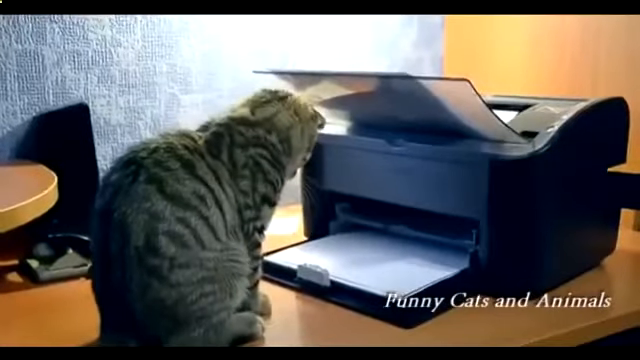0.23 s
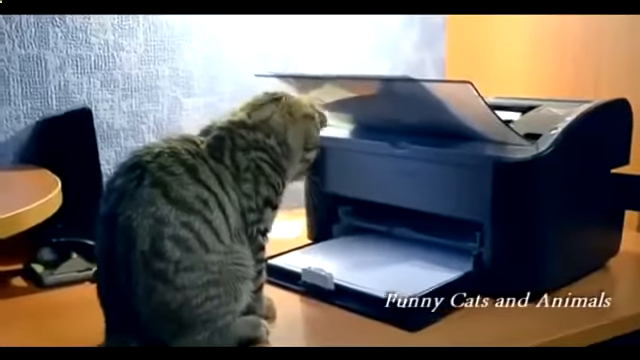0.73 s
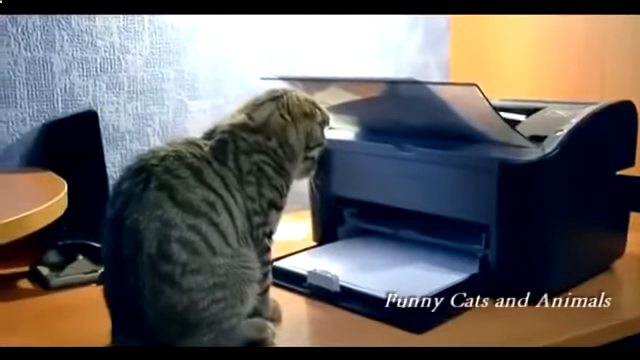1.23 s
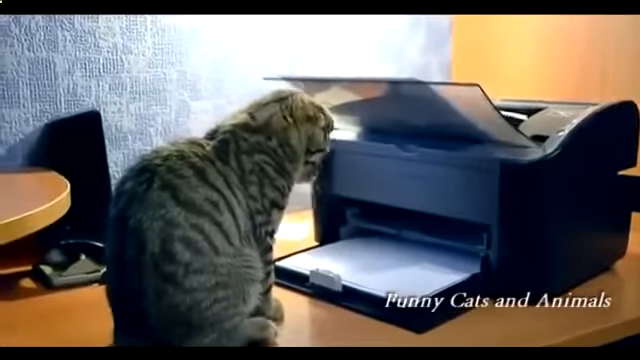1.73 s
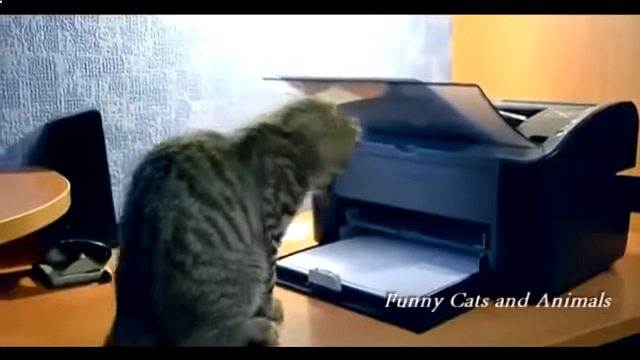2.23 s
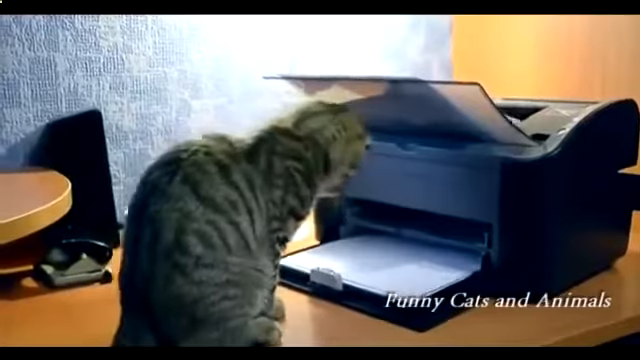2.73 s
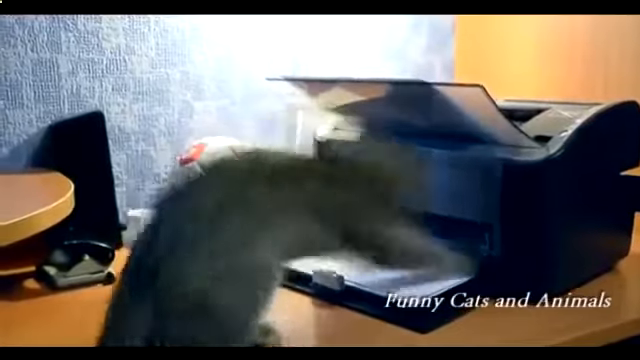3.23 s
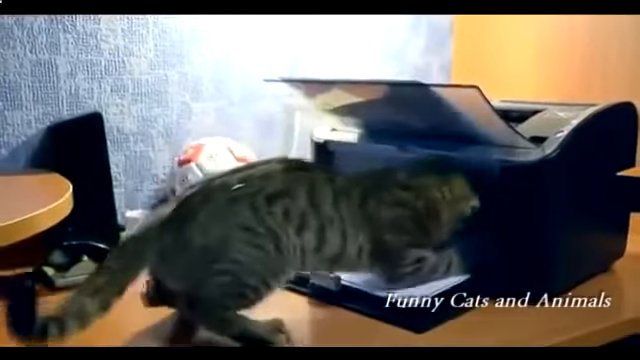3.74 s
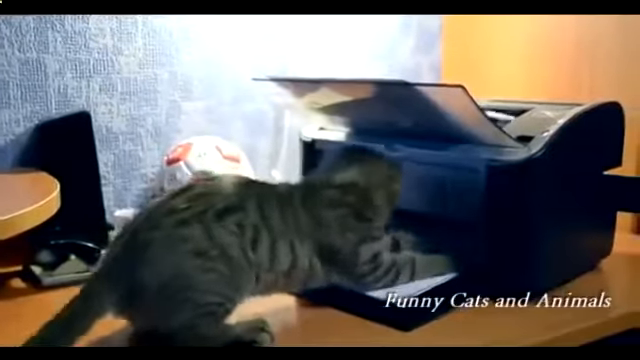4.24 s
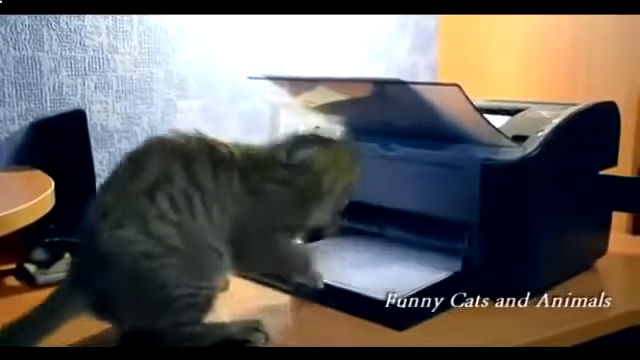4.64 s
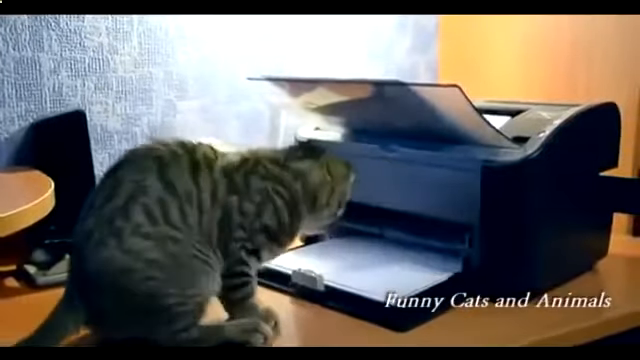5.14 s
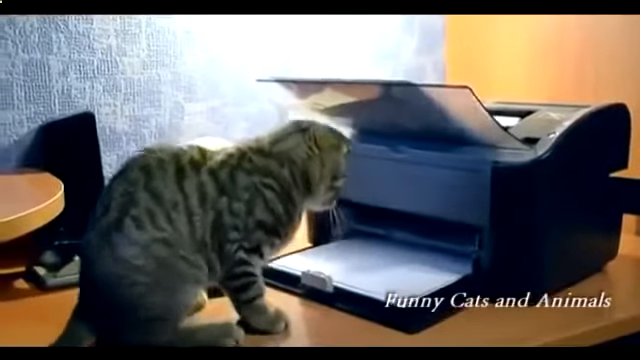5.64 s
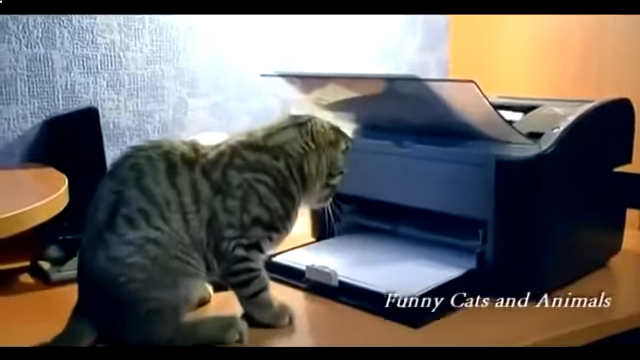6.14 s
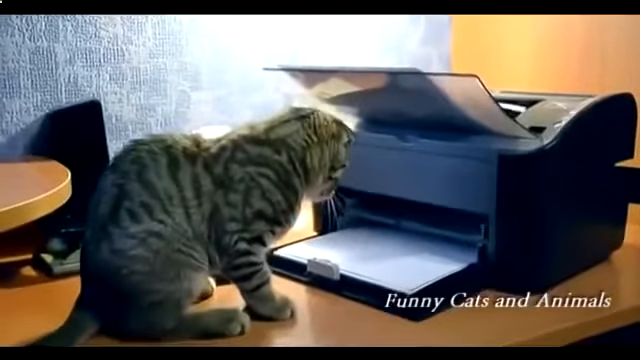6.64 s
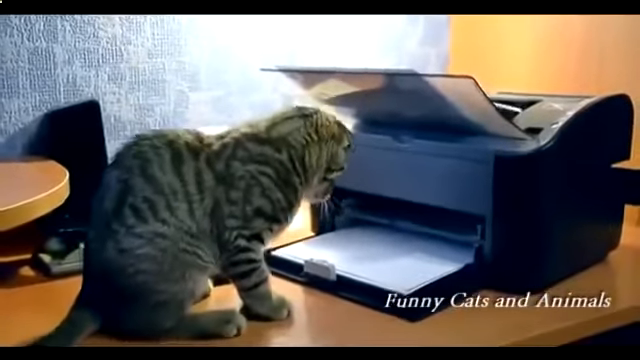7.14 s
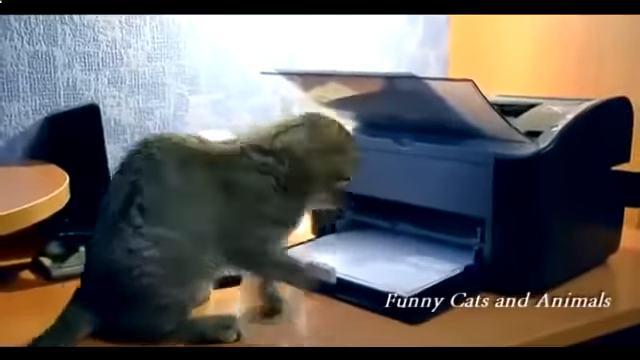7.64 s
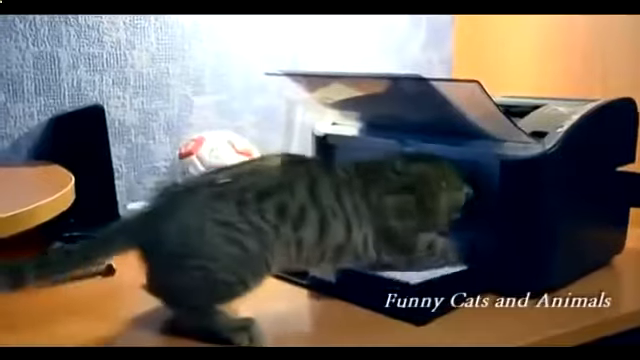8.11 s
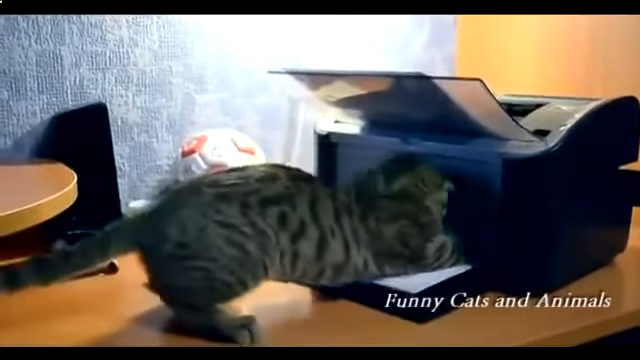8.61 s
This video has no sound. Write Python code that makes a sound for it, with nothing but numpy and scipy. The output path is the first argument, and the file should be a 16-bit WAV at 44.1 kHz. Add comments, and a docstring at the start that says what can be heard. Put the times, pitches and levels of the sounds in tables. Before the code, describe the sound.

A desktop printer runs in a small room with a steady whine, whirring gears, a low fan and the soft hiss of sliding paper. It feeds two sheets, each with a run of plastic clacks, a sharp latch snap and a brief dry crackle. After each run, a cat bats at the tray, making it knock and rattle, and briefly scrapes the paper. The sounds are centred and fairly close.

```python
"""A steady whine over whirring gears, hissing paper and a low fan: a desktop laser printer feeds
two sheets in a small room. The scanner motor holds its pitch; the drive gear sings as the rollers pull.
Clutches and flaps clack in the plastic case, a latch snaps and the paper crackles, in a cycle that
comes round with each sheet. After each cycle's clacks a cat paws at the tray and scrapes the paper."""
import sys
import numpy as np
from scipy import signal
from scipy.fft import rfft, irfft
from scipy.io import wavfile

SR = 44100
rng = np.random.default_rng(int(sys.argv[2]) if len(sys.argv) > 2 else 0)


def unload_audio(sound):
    """Save the sound as a 16-bit wav file, at the path given as the first command line argument."""
    columns = np.transpose(np.atleast_2d(sound))
    # keep every value between -1 and 1, then stretch to whole-number steps
    steps = np.round(np.clip(columns, -1, 1) * 32767)
    wavfile.write(sys.argv[1], SR, steps.astype(np.int16))


N = 391166
TIME = np.arange(N) / SR
SHEET_S = 4.8  # one feed cycle


def amp(db):
    """Decibels to gain."""
    return 10 ** (np.asarray(db) / 20)


def unit(x):
    """Normalises to rms 1."""
    return x / np.sqrt(np.mean(x ** 2) + 1e-20)


def curve_at(points, hz):
    """Reads a curve along a log-frequency axis."""
    f, value = np.transpose(points)
    return np.interp(np.log(hz + 1), np.log(f), value)


def wander(hz):
    """Random modulator of rms 1, rolling off above hz."""
    f = np.fft.rfftfreq(N, 1 / SR)
    return unit(irfft(rfft(rng.standard_normal(N)) / (1 + (f / hz) ** 4), N))


def swell(middle_s, half_s):
    """Bell-shaped envelope of height 1."""
    return np.exp(-((TIME - middle_s) / half_s) ** 2)


def tone(hz, flutter, drift, flutter_hz=11.7):
    """A sine with random flutter in level and drift in pitch."""
    turns = np.cumsum(hz * (1 + drift * wander(3.84))) / SR
    return np.sqrt(2) * np.sin(2 * np.pi * turns) * (1 + flutter * wander(flutter_hz))


# resonances of the plastic case: f/Hz, width/Hz, boost/dB
CASE_MODES = [(359, 62, 1.5), (509.5, 45, 5), (740, 78, -1), (835, 45, 2), (1075, 38, 0.5),
              (1260, 38, -1.5), (1293, 110, 2), (1634, 82, 0.5), (1920, 42, -2), (2065, 69, 2.5),
              (2317, 48, -2.5), (2740, 96, 1), (3340, 73, 0.5), (3700, 88, 2), (6220, 180, 3),
              (6880, 94, 2)]
def colour(x, eq, ring=0., size=4096):
    """Causal filter of unit energy: a broad EQ curve plus a share (ring) of the case resonances."""
    f = abs(np.fft.fftfreq(size, 1 / SR))
    peaks_db = sum(db / (1 + (2 * (f - hz) / width) ** 2) for hz, width, db in CASE_MODES)
    log_gain = np.log(amp(curve_at(eq, f) + ring * peaks_db))
    taps = np.fft.ifft(np.exp(np.conj(signal.hilbert(log_gain)))).real  # minimum phase
    return signal.oaconvolve(x, taps / np.linalg.norm(taps))[:N]


# the whine lifts while the cat leans into the tray: middle t/s, half length/s, boost/dB
CAT_LEANS = [(3.8, 0.14, 2), (8.182, 0.26, 3)]
# steady weaker tones beside the whine: f/Hz, level/dB, flutter depth
STEADY_TONES = [(132, -71, 0.76), (263.6, -74, .7), (311.5, -66, 0.25), (368.6, -70.5, .7),
                (415.5, -65, 0.35), (630, -67.5, .6), (760, -70, 0.81), (840, -66.5, 0.69),
                (1016, -60, 0.68), (1063, -64.5, 0.94), (2010, -67, 0.49), (2035, -67, 0.5),
                (2350, -70.5, 0.54)]
def scanner(whine_hz=504.05, whine_db=-43.5, sway_db=0.42):
    """The mirror motor, locked to its speed, whines on one pitch among weaker tones."""
    level_db = whine_db + sway_db * wander(12.0) + sum(db * swell(s, half) for s, half, db in CAT_LEANS)
    whine = amp(level_db) * tone(whine_hz, flutter=0.039, drift=0.00052)
    return whine + sum(amp(db) * tone(hz, flutter, drift=0.001916) for hz, db, flutter in STEADY_TONES)


# fader moves over one feed cycle: t/s, paper level/dB, gear whirr level/dB
FEED_FADERS = [(0.04, -57.5, -44), (0.32, -54, -42.5), (0.92, -51, -42.5), (1.15, -55.5, -45),
               (1.55, -53.5, -44.5), (1.85, -55.5, -44.5), (2.1, -54.5, -42.5), (2.42, -54.5, -44.5),
               (2.62, -52.5, -40.5), (2.85, -54, -45.5), (3.08, -56.5, -43.5), (3.21, -60, -48),
               (3.4, -58.5, -47.5), (3.6, -59, -46.5), (3.85, -56.5, -44.5), (4.55, -55.5, -44)]
def feed_gain(layer):
    """Gain envelope of "paper" or "whirr", looping with each sheet."""
    times, paper_db, whirr_db = np.transpose(FEED_FADERS)
    return amp(np.interp(TIME, times, {"paper": paper_db, "whirr": whirr_db}[layer], period=SHEET_S))


# midrange EQ of the rubbing teeth: f/Hz, level/dB
WHIRR_EQ = [(200, -33), (450, -7.5), (720, -4), (880, 2), (1100, 3.5), (1400, 2), (2100, 0.5), (2500, -1.5),
            (3200, -5.5), (4300, -12.5), (8000, -50), (12000, -67)]
def gear_whirr(tooth_hz=209.5, throb=0.072, lumpy_db=0.76):
    """Teeth rub inside the case: lumpy noise that throbs at the tooth rate."""
    tooth_cycles = np.cumsum(tooth_hz * (1 + 0.0054 * wander(3.1))) / SR
    teeth = 1 + throb * np.cos(2 * np.pi * tooth_cycles)
    rub = unit(rng.standard_normal(N) * teeth * amp(lumpy_db * wander(90)))
    return amp(-3.0) * feed_gain("whirr") * colour(rub, WHIRR_EQ, ring=0.46)


# pulls of the rollers: start t/s, length/s, level/dB
ROLLER_PULLS = [(0.505, 0.3, -46.5), (1.26, 0.51, -48), (1.7, 1.7, -50), (5.84, 0.5, -49.5),
                (6.245, 1.46, -51.5), (7.9, 1.2, -53.5)]
def roller_pull(idle_db=-57, ramp_s=0.1, ease_db_per_s=1.6):
    """Envelope of the gear's song: it idles, swells with each pull and eases off."""
    power = amp(idle_db) ** 2
    for s, length, db in ROLLER_PULLS:
        t = np.clip(TIME - s, 0, length)
        grip = np.minimum(np.minimum(t, length - t) / ramp_s, 1)
        power = power + (grip * amp(db - ease_db_per_s * t)) ** 2
    return np.sqrt(power)


# the gear's shrill overtone comes and goes with the load: t/s, level/dB
SHRILL_FADER = [(0.0, -68), (0.42, -60), (1.25, -60.5), (1.55, -62), (1.7, -78), (2.88, -87), (3.03, -63),
                (3.48, -65), (3.65, -72), (4.4, -68), (4.75, -69), (5.3, -61.5), (6.42, -61), (6.6, -83),
                (7.62, -82), (7.76, -60.5), (8.08, -60), (8.3, -73), (8.87, -75)]
def gear_song(mesh_hz=612.8):
    """The drive gear sings on harmonics 2, 3 and 6 of its tooth-mesh pitch."""
    second = roller_pull() * tone(2 * mesh_hz, flutter=0.21, drift=0.001575, flutter_hz=25)
    third = amp(-64.0) * tone(3 * mesh_hz, flutter=1.0, drift=0.00078)
    shrill_db = np.interp(TIME, *np.transpose(SHRILL_FADER)) + 2.5
    sixth = amp(shrill_db) * tone(6 * mesh_hz, flutter=0.21, drift=0.0005, flutter_hz=35)
    return second + third + sixth


# bright EQ of sliding paper: f/Hz, level/dB
PAPER_EQ = [(800, -17.5), (2000, 7), (3200, 3), (4500, 2), (7000, 2), (8000, 1), (9300, -2.5),
            (10300, -11.5), (10900, -22), (11400, -41), (12500, -69)]
def paper(catches_per_s=70, catch_db=-11, catch_decay_s=0.008, drag_db=0.5):
    """The sheet slides over guides in a fine hiss, its fibres catching now and then."""
    slide = rng.standard_normal(N)
    catches = (rng.random(N) < catches_per_s / SR) * rng.uniform(.3, 1, N)
    catch_envelope = signal.lfilter([1], [1, -np.exp(-1 / (catch_decay_s * SR))], catches)
    rasp = amp(catch_db) * unit(catch_envelope * rng.standard_normal(N))
    drag = amp(drag_db * wander(7))  # the sheet presses unevenly on the guides
    return amp(2.0) * feed_gain("paper") * drag * colour(slide + rasp, PAPER_EQ, ring=.2)


# dark EQ of the cooling fan: f/Hz, level/dB
FAN_EQ = [(20, -24), (50, -47), (80, -6.5), (125, -8.5), (165, 1), (270, 3), (400, 1), (600, 5), (1000, -5),
          (3000, -69), (8000, -73)]
def fan():
    """A low rush of cooling air, coloured by the case."""
    return amp(-56.0) * colour(rng.standard_normal(N), FAN_EQ, ring=0.51)


# EQ of the noise floor: f/Hz, level/dB
HISS_EQ = [(20, -3), (100, 2), (1000, -7), (2600, -29), (4000, 14), (6500, 4), (10000, -1.5), (11500, -37)]
def hiss():
    """A faint, wide hiss, independent in left and right."""
    return amp(-78.5) * np.array([colour(rng.standard_normal(N), HISS_EQ) for _ in range(2)])


# clutch and flap hits on the first sheet: t/s, knock/dB, snap/dB, thump/dB, hollow/dB, rattle t60/s;
# then offsets for the second sheet: delay/s, knock and thump/dB, snap/dB
MECHANISM_HITS = [(0.925, -28, -37, -48.5, -71, 0.19, 0.0065, 0.5, 3.5),
                  (1.006, -27.5, -40.5, -42.5, -38, 0.14, 0.017, -6, -16),
                  (1.011, -22.5, -35, -51, -34.5, 0.15, 0.017, 0.5, -0.5),
                  (1.281, -30, -43, -62, -63, 0.12, .005, -3, -0.5),
                  (1.304, -26, -38, -63, -62, 0.11, 0.007, -2.5, -3.5),
                  (1.858, -27, -45, -57, -51, 0.049, -0.021, 1, 3),
                  (1.932, -16, -44.5, -43, -29, 0.12, 0.0062, -0.5, 2),
                  (1.948, -14, -46, -54, -33, 0.07, 0.008, -2.5, -9),
                  (1.979, -27, -66, -50, -37.5, 0.23, -0.001, -0.5, -3),
                  (2.073, -18.5, -44, -58, -36.5, 0.24, -0.0135, -0.5, 1),
                  (2.085, -14, -28.5, -37, -49, 0.064, -0.012, -1.5, -5.5),
                  (2.115, -33, -42, -47.5, -43, 0.13, -0.013, 3, -6),
                  (2.161, -25.5, -37, -61, -39, 0.14, 0.0039, -0.5, 1),
                  (2.748, -27, -48, -47.5, -39.5, 0.14, -0.0164, 0, 1),
                  (2.889, -24, -38, -66, -43, 0.13, 0.0079, -1.5, 0),
                  (2.898, -29, -41, -52, -44, 0.35, 0.013, -2, 0.5),
                  (2.97, -39, -39.5, -47, -60, 0.082, -0.018, 4, -1),
                  (3.011, -31, -52, -66, -55, 0.08, -0.0048, -2, -3),
                  (3.044, -17, -38.5, -42, -37.5, 0.14, -0.0145, 1.5, 0.5),
                  (3.064, -24.5, -41, -40, -40, 0.18, -0.013, 1, 1)]
def clacks(rise_s=0.0034):
    """Clutches and flaps strike the case in a pattern that returns, slightly varied, for sheet two."""
    hits = [(s + sheet * (SHEET_S + delay), knock + sheet * harder, snap + sheet * brighter,
             thump + sheet * harder, hollow, t60, rise_s)
            for sheet in range(2)
            for s, knock, snap, thump, hollow, t60, delay, harder, brighter in MECHANISM_HITS]
    return blows(hits, knock_db=-6.0, snap_db=2.5, thump_db=3.5, hollow_db=-2.0,
                 ring_db=-20.0, crack=0.056, chatter_db=1.6)


# EQs of a blow's layers (mid knock, bright snap, low thump, hollow body): f/Hz, level/dB
KNOCK_EQ = [(100, -37.5), (300, -14), (450, -3.5), (600, -6), (750, -3), (1100, 2), (1450, 1), (2100, 0),
            (3000, -7.5), (4000, -16.5), (4700, -19), (7000, -28.5), (10500, -62), (12000, -81)]
SNAP_EQ = [(500, -14), (1400, 3.5), (2200, 4.5), (4200, 6), (5200, 5), (6700, 6), (8000, 4), (9300, 1),
           (10800, -13.5), (12000, -69), (14000, -51)]
THUMP_EQ = [(30, -28), (70, -26), (115, -5), (160, -4.5), (205, -2.5), (270, 2.5), (380, 3), (600, -4),
            (1200, -44), (4000, -70), (11000, -99)]
HOLLOW_EQ = [(30, -91), (200, -59), (600, -15), (740, 4.5), (800, 3.5), (880, 3), (1050, -32.5),
             (2000, -46), (6000, -87)]
def blows(hits, knock_db, snap_db, thump_db, hollow_db, ring_db, crack, chatter_db, bounce_share=0.47):
    """Each blow is a crack, a ring of the case and a dying rattle of loose plastic."""
    knock, snap, thump, hollow = np.zeros((4, N))  # power envelopes
    for s, mid_db, bright_db, low_db, cavity_db, t60, rise_s in hits:
        start = round(s * SR)
        span = slice(start, min(start + SR // 2, N))
        t = TIME[span] - TIME[start]
        attack = 1 - np.exp(-t / rise_s)
        decay = amp(-60 * t / t60) + crack * np.exp(-t / 0.0031)
        power = (attack * decay) ** 2
        knock[span] += amp(mid_db) ** 2 * power
        snap[span] += amp(bright_db) ** 2 * power * np.exp(-t / 0.016)  # treble dies sooner
        thump[span] += amp(low_db) ** 2 * power * (1 - np.exp(-t / 0.0013))  # the desk answers late
        hollow[span] += amp(cavity_db) ** 2 * power  # the air in the paper bay
    chatter = unit(amp(chatter_db * wander(300)))  # parts touch and part again, in all bands at once
    out = case_ring(hits, ring_db)
    bounces = rattle()
    for power, eq, trim_db in [(knock, KNOCK_EQ, knock_db), (snap, SNAP_EQ, snap_db),
                               (thump, THUMP_EQ, thump_db), (hollow, HOLLOW_EQ, hollow_db)]:
        grit = np.sqrt(bounce_share) * bounces * rng.choice([-1, 1], N)
        noise = np.sqrt(1 - bounce_share) * chatter * rng.standard_normal(N)
        out += amp(trim_db) * colour(np.sqrt(power) * (grit + noise), eq, ring=1.)
    return out


def case_ring(hits, ring_db, spread_db=-0.5, damping=0.81, above_hz=480):
    """Each blow rings the case modes, in a mix that varies with where it happens to land."""
    hz, width, mode_db = np.transpose(CASE_MODES)[:, :, None]
    t, out = TIME[:SR // 5], np.zeros(N)
    attack, decay = 1 - np.exp(-t / 0.0016), np.exp(-np.pi * damping * width * t)
    for s, knock_db, *_ in hits:
        where, phase = rng.uniform(-1.23, 1, (2, len(CASE_MODES), 1))
        gains = amp(mode_db + curve_at(KNOCK_EQ, hz) + spread_db * where)
        ring = attack * (gains * decay * np.sin(2 * np.pi * hz * t + np.pi * phase)).sum(0)
        slot = out[round(s * SR):][:len(t)]
        slot += amp(knock_db + ring_db) * ring[:len(slot)]
    low_cut = signal.butter(4, above_hz, "highpass", fs=SR, output="sos")
    return signal.sosfilt(low_cut, out)  # the ring is kept out of the bass


def rattle(contacts_per_s=500):
    """A loose part bounces: separate hard contacts at uneven intervals, rms 1."""
    count = np.cumsum(contacts_per_s * amp(4 * wander(200))) / SR
    impulses = np.diff(np.floor(count), prepend=0)
    return unit(impulses * rng.choice([-1, 1], N) * rng.uniform(0.54, 1, N))


# one latch snap a sheet: t/s, level/dB
LATCH_SNAPS = [(1.414, -31.5), (6.229, -31.5)]
# EQ of its click: f/Hz, level/dB
CLICK_EQ = [(500, -14), (1400, 5), (1900, 12.5), (2500, 2), (3000, 2), (3400, 3), (4200, 4), (4600, -1),
            (5200, 1), (5750, 8.5), (6400, 0), (7500, 6), (8200, -5), (9500, -0.5), (10800, -10),
            (12000, -46)]
# modes of its spring: f/Hz, level/dB, t60/s
SPRING_MODES = [(1780, -17, 0.091), (1910, 4, 0.11), (2230, 1, 0.13), (2430, -2, 0.13), (3330, -6, 0.11),
                (4130, 1, 0.073), (5680, -4, 0.11), (5700, -18, 0.12), (7050, -13, 0.13), (7600, -1, .11),
                (9080, -11, .13), (9300, -7, 0.11)]
def latch(click_db=-1, click_t60=0.15, spring_db=-7.0, crack=0.78, crack_s=0.0043):
    """The latch snaps with a sharp click that sets its small spring ringing."""
    click, ring = np.zeros((2, N))
    for s, db in LATCH_SNAPS:
        t = np.maximum(TIME - s, 0)
        strike = amp(db) * (1 - np.exp(-t / 0.00085))
        decay = amp(-60 * t / click_t60) + crack * np.exp(-t / crack_s)
        click += strike * decay * rng.standard_normal(N)
        for hz, mode_db, t60 in SPRING_MODES:
            ring += strike * amp(mode_db - 60 * t / t60) * np.sin(2 * np.pi * (hz * t + rng.random()))
    return amp(click_db) * colour(click, CLICK_EQ) + amp(spring_db) * ring


# claws or metal touching hard plastic: t/s, level/dB
HARD_TOUCHES = [(1.414, -27), (3.526, -25), (4.707, -30), (5.731, -33), (6.229, -28), (6.965, -33),
                (8.275, -36)]
def ticks(trim_db=-20, t60=0.032, band_hz=(12000, 14500)):
    """Claws and metal parts are hard: their touch opens with a very short, very high tick."""
    t, envelope = TIME[:SR // 10], np.zeros(N)
    for s, db in HARD_TOUCHES:
        envelope[round(s * SR):][:len(t)] += amp(db - 60 * t / t60)
    top_band = signal.butter(4, band_hz, "bandpass", fs=SR, output="sos")
    return amp(trim_db) * signal.sosfilt(top_band, envelope * rng.standard_normal(N))


# when each moving part strikes: t/s, level/dB
CLUTCH_HITS = [(1.934, -30.5), (6.740, -33)]
STOP_HITS = [(2.086, -30.5), (6.872, -34.5)]
FLAP_HITS = [(2.163, -43), (6.968, -47)]
LEVER_HITS = [(2.893, -35), (3.046, -41), (7.703, -34), (7.831, -33)]
# the modes each part rings with: f/Hz, level/dB, t60/s
CLUTCH_RING = [(1403, -1, 0.16), (1860, -15, .16), (2520, -4, .13), (3350, -22, 0.12), (3740, -24, 0.1),
               (3990, -19, 0.13), (4810, -18, .12)]
STOP_RING = [(1790, -9, 0.12), (2040, -0.5, 0.15), (2290, 0, .13), (2870, -9, 0.15), (3264, -4, 0.14),
             (3620, -5, 0.13), (3960, -6, .11), (6260, -6, 0.093)]
FLAP_RING = [(1340, 11, 0.12), (2940, 0, 0.14), (3590, -6, .1), (4080, 2.5, 0.063), (4970, 5, 0.061)]
LEVER_RING = [(1257, -3.5, 0.088), (2300, 2, 0.12), (3140, -22, 0.092), (5340, -19, .1), (6900, -8, .09),
              (7480, -10, .09)]
def part_rings(rise_s=0.0011):
    """The feed clutch, its end stop, a flap and a lever each give their clack a pitch of its own."""
    t, out = TIME[:SR // 4], np.zeros(N)
    attack = 1 - np.exp(-t / rise_s)
    for hits, modes in [(CLUTCH_HITS, CLUTCH_RING), (STOP_HITS, STOP_RING),
                        (FLAP_HITS, FLAP_RING), (LEVER_HITS, LEVER_RING)]:
        for s, db in hits:
            ring = sum(amp(mode_db - 60 * t / t60) * np.sin(2 * np.pi * (hz * t + rng.random()))
                       for hz, mode_db, t60 in modes)
            out[round(s * SR):][:len(t)] += amp(db) * attack * ring
    return out


# each sheet buckles midway through its cycle: t/s, knock/dB, snap/dB
SHEET_BUCKLES = [(2.507, -31, -45), (2.520, -28.5, -40), (2.573, -26, -45), (2.594, -30.5, -45),
                 (2.620, -31, -46), (2.641, -28, -49), (2.660, -34, -50), (7.305, -32, -49),
                 (7.357, -27, -51), (7.378, -31, -53), (7.416, -28, -42), (7.437, -30, -43),
                 (7.447, -27, -48), (7.467, -27, -37.5)]
def crackles(thump_db=-62, hollow_db=-55, t60=0.072, rise_s=0.0018):
    """The bending sheet snaps in short, dry crackles."""
    hits = [(s, knock, snap, thump_db, hollow_db, t60, rise_s) for s, knock, snap in SHEET_BUCKLES]
    return blows(hits, knock_db=-8.0, snap_db=0.5, thump_db=0.0, hollow_db=1.0,
                 ring_db=-23.0, crack=0.35, chatter_db=3.0)


# paws landing: t/s, knock/dB, snap/dB, thump/dB, hollow/dB, rattle t60/s, rise/s
PAW_HITS = [(3.526, -44, -31.5, -59, -58, 0.24, 0.0016), (3.543, -26.5, -35, -44.5, -43, 0.17, 0.002),
            (3.577, -34.5, -40.5, -61, -47, 0.54, 0.0018), (3.613, -27, -43, -67, -50, 0.11, 0.0043),
            (4.155, -39.5, -48, -59, -56, 0.093, .002), (4.434, -30, -45, -56, -61, 0.12, 0.00081),
            (4.707, -21, -29, -40.5, -30, 0.074, 0.0032), (4.726, -25, -31, -43, -43, 0.072, 0.0024),
            (4.807, -28.5, -62, -65, -53, 0.056, 0.0027), (4.900, -31, -36.5, -54, -49, 0.069, 0.00096),
            (8.041, -34.5, -43, -57, -58, 0.22, 0.0047), (8.065, -31.5, -39.5, -55, -47, 0.45, 0.001),
            (8.25, -30.5, -37.5, -55, -46, 0.27, 0.0084), (8.286, -34.5, -40.5, -66, -49, 0.34, 0.0088),
            (8.546, -29, -56, -52, -32.5, 0.06, 0.0011)]
def paws():
    """The cat bats at the tray and paper, and the plastic knocks and rattles."""
    return blows(PAW_HITS, knock_db=-2.0, snap_db=5.5, thump_db=8.5, hollow_db=-2.5,
                 ring_db=-15, crack=0.21, chatter_db=1.0)


# a scrape after each pounce: middle t/s, half length/s, level/dB, tray murmur offset/dB
PAW_SCRAPES = [(3.803, 0.13, -45, -2), (8.197, 0.13, -46, -10)]
def scrapes(rasp_hz=3070, tray_hz=350, rasp_db=-8, rustle_db=-5):
    """The sheet sticks and slips under a paw: a narrow rasp in a rustle, and a murmur from the tray."""
    rasp = (wander(50) + wander(400)) * np.cos(2 * np.pi * rasp_hz * TIME)
    tray = wander(63) * np.cos(2 * np.pi * tray_hz * TIME)
    sheet = amp(rasp_db) * rasp + amp(rustle_db) * colour(rng.standard_normal(N), PAPER_EQ)
    return sum(amp(db) * swell(s, half) * (sheet + amp(tray_db) * tray)
               for s, half, db, tray_db in PAW_SCRAPES)


# reverb time of the small room: f/Hz, t60/s
ROOM_DECAY = [(100, 0.18), (500, 0.34), (1500, 0.27), (4000, 0.23), (10000, 0.16)]
def room(x, density=0.08, predelay_s=0.006):
    """Dense reflections from near walls, the treble dying first."""
    length = SR // 2
    taps = rng.standard_normal(length) * (rng.random(length) < density) * (TIME[:length] > predelay_s)
    hz, t, bands = signal.stft(taps, SR, nperseg=256)
    decay = amp(-60 * t / curve_at(ROOM_DECAY, hz)[:, None])
    tail = signal.istft(bands * decay, SR, nperseg=256)[1]
    return signal.oaconvolve(x, tail / np.linalg.norm(tail))[:N]


def scene():
    """Printer and cat sit centre over a stereo hiss; only the hits feed the reverb."""
    hits = clacks() + part_rings() + crackles() + paws() + latch() + ticks()
    reverb = amp(-7.5) * room(hits)
    running = scanner() + gear_whirr() + gear_song() + paper() + fan()
    return hits + reverb + running + scrapes() + hiss()


def record(dry, notch_hz=7900, width_hz=600, notch_db=-8, cutoff_hz=15000):
    """The microphone port notches the treble; a steep low-pass takes off the top."""
    f = np.fft.rfftfreq(N, 1 / SR)
    port = amp(notch_db / (1 + (2 * (f - notch_hz) / width_hz) ** 2))
    notched = irfft(rfft(dry) * port, N)
    lowpass = signal.firwin(511, cutoff_hz, window=("kaiser", 9), fs=SR)
    return signal.oaconvolve(notched, lowpass[None], "same")


dry = scene()
out = record(dry)
unload_audio(out)
```